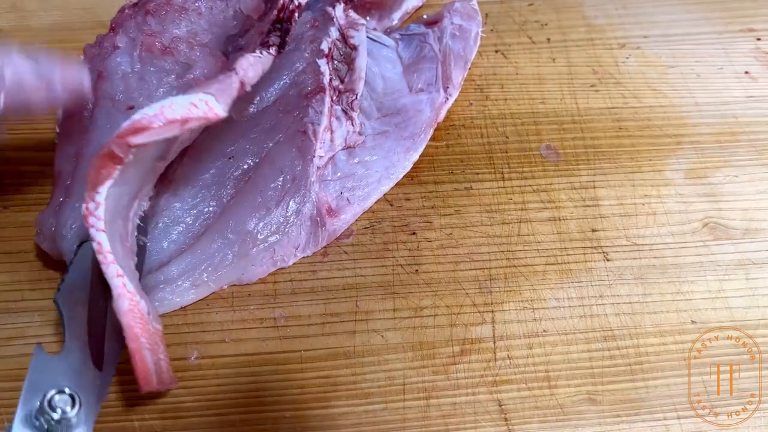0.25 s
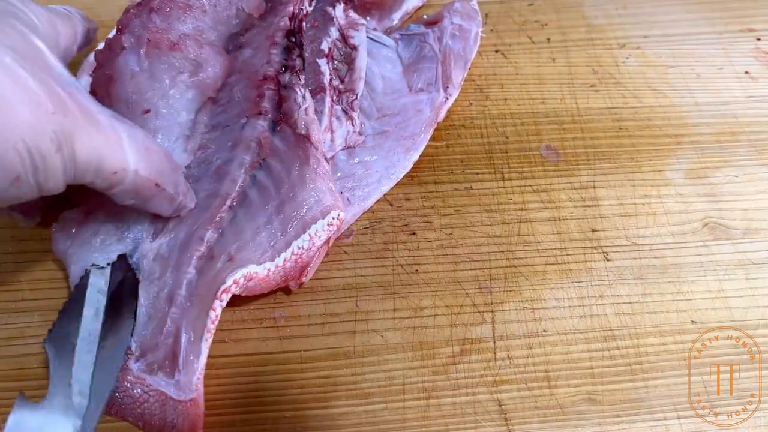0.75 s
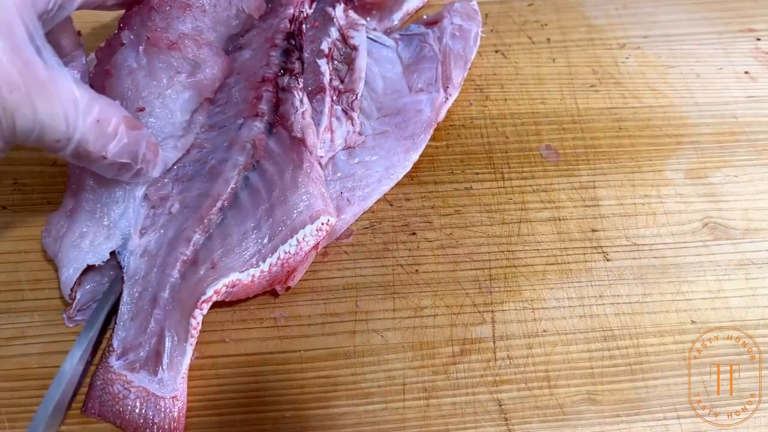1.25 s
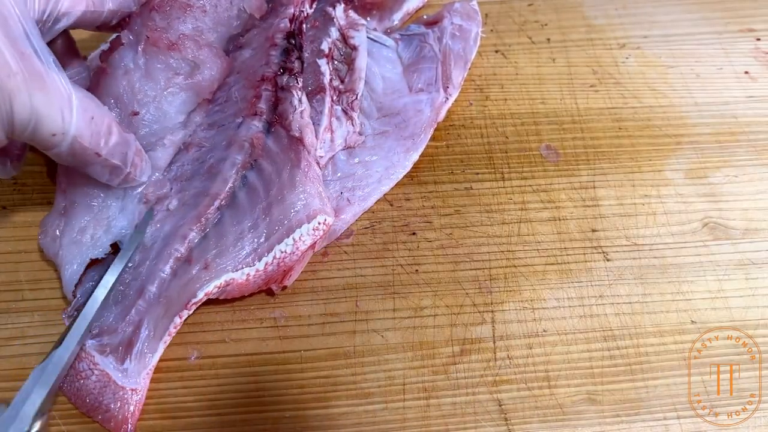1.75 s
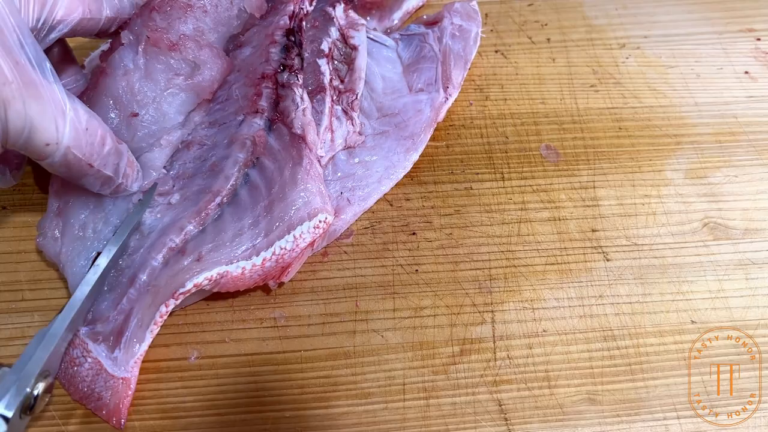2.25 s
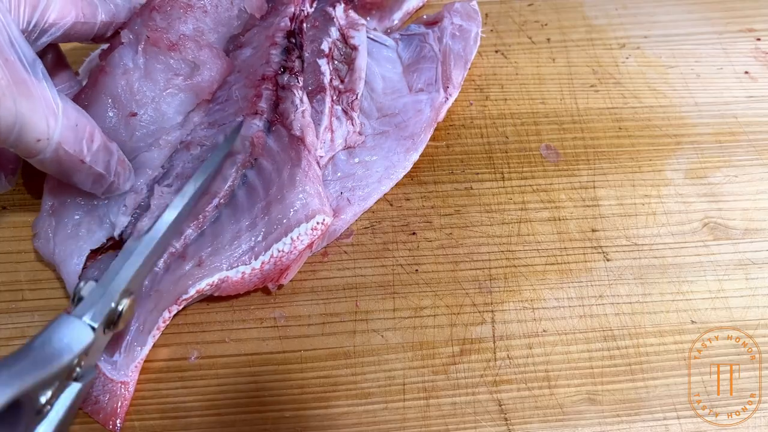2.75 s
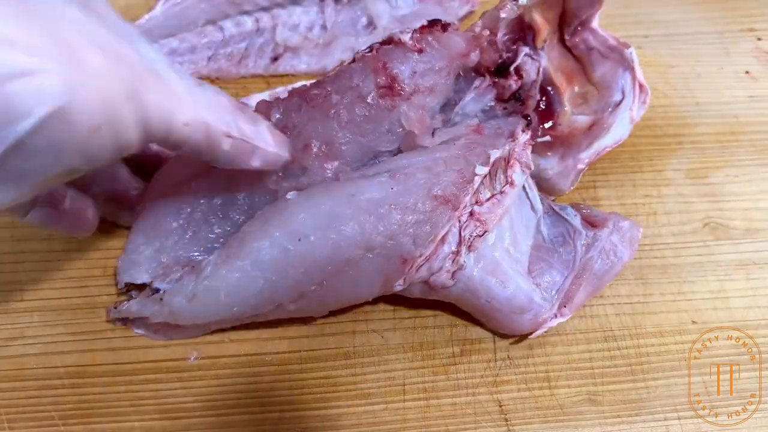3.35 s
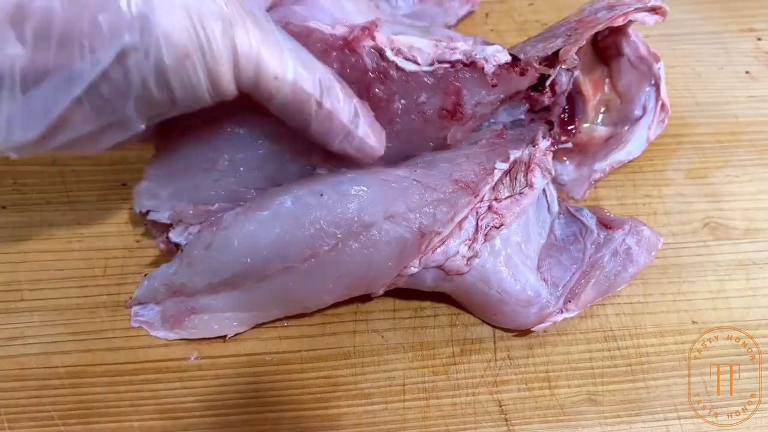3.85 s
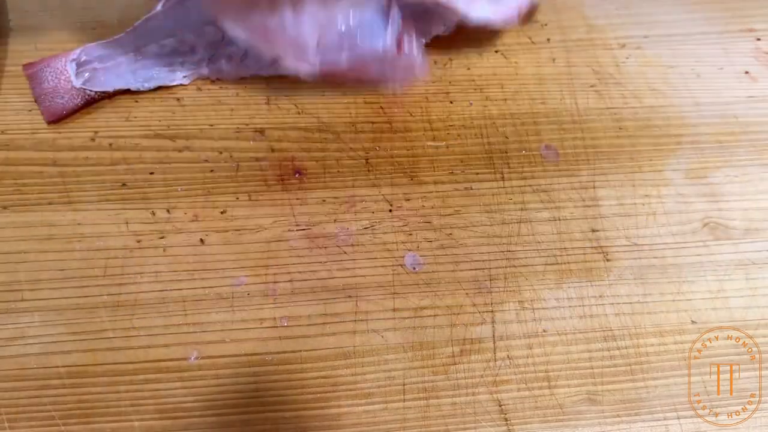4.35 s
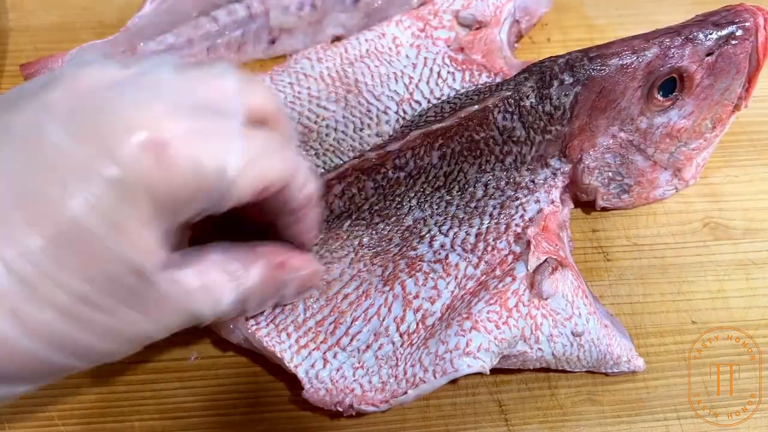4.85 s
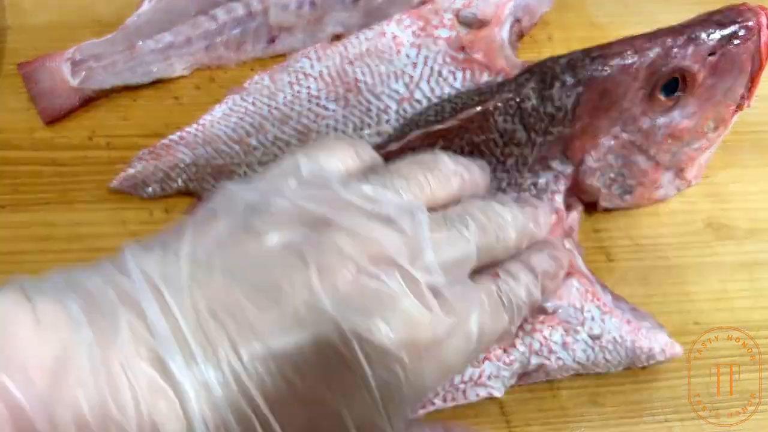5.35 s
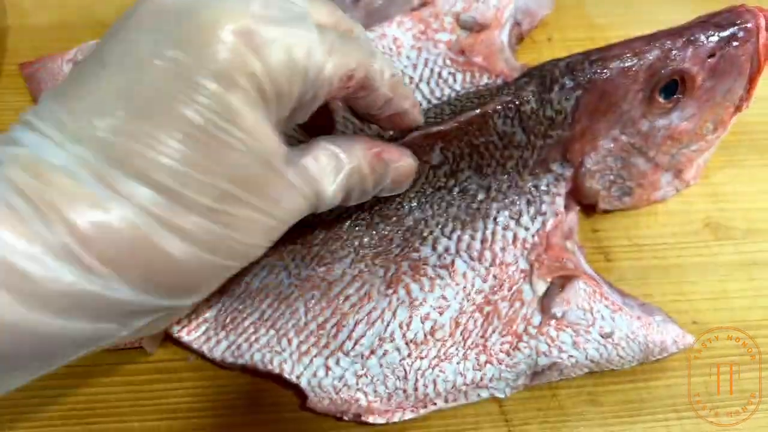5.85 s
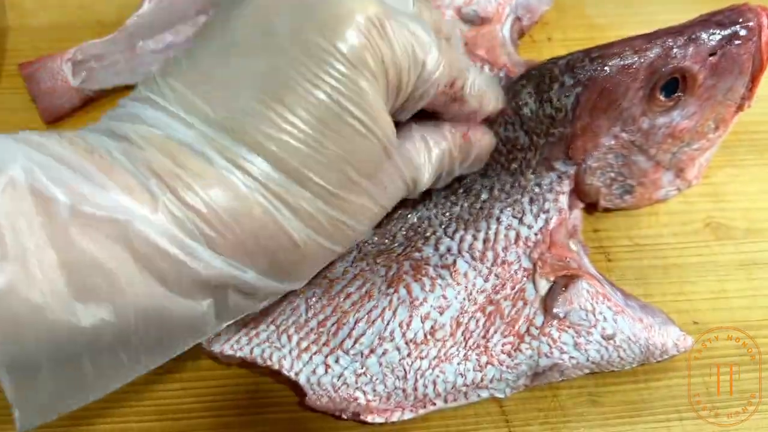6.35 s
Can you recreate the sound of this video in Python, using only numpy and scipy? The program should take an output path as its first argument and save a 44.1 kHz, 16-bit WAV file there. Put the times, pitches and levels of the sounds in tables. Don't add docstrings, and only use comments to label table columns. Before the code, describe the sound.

A close, dry-ish take in a small hard-walled kitchen, with a faint low appliance hum and soft air noise throughout. From 0 to 0.8 s thin plastic gloves crackle and wet flesh rubs and pops as a flap is folded; around 0.3 s the shears clack shut with a dull double knock on the wooden board. From 1 to 1.9 s it is nearly quiet, only tiny creaks. A soft low thud at 1.9 s, then a rising steel scrape at 2.0-2.15 s. At 2.35 s a sharp snip cracks bone; at 2.66 s a second, much louder crunch, both with a brief bright steel ring. From 2.9 to 4.0 s gloves crinkle and flesh squelches, strongest near 3.7 s. After a lull at 4.2 s, a rustling burst at 4.4-4.8 s lays the fish down, followed by lighter crinkles, pats and sticky pops until 6.6 s.

```python
import sys
import numpy as np
from scipy import signal
from scipy.fft import rfft, irfft
from scipy.io import wavfile
from scipy.ndimage import uniform_filter1d

SR = 44100
rng = np.random.default_rng(int(sys.argv[2]) if len(sys.argv) > 2 else 0)


def to_wav(s):
    ch = np.atleast_2d(s).T
    pcm = np.round(np.clip(ch, -1, 1) * 32767)
    wavfile.write(sys.argv[1], SR, pcm.astype(np.int16))


def gain_from_db(level_db):
    decades = np.asarray(level_db, float) / 20
    return 10 ** decades


N = 291501


def evened(x):
    return x / np.sqrt(np.mean(x ** 2) + 1e-20)


def crest(x):
    return x / np.sqrt(uniform_filter1d(x ** 2, size=130).max())


def read(points, hz):
    f, value = np.transpose(points)
    return np.interp(np.log(hz + 1), np.log(f + 1), value)


def coloured(x, points):
    gain_db = read(points, abs(np.fft.fftfreq(4096, 1 / SR)))
    log_gain = np.log(gain_from_db(np.maximum(gain_db, -100)))
    taps = np.fft.ifft(np.exp(np.conj(signal.hilbert(log_gain)))).real[:2048]
    return signal.oaconvolve(x, taps / np.linalg.norm(taps))[:len(x)]


def resonate(x, hz, width_hz):
    pole = np.exp((2j * np.pi * hz - np.pi * abs(width_hz)) / SR)
    return 2 * signal.lfilter([1 - abs(pole)], [1, -pole], x).real


def ring(x, modes, longest_s):
    t = np.arange(SR // 4) / SR
    taps = np.zeros(len(t))
    for hz, db, t60_s in modes:
        taps += gain_from_db(db - 60 * t / min(t60_s, longest_s)) * np.sin(2 * np.pi * hz * t)
    return signal.oaconvolve(x, taps / abs(taps).max())[:len(x)]


def add(mix, s, sound):
    part = mix[round(s * SR):][:len(sound)]
    part += sound[:len(part)]


def burst(noise, length_s):
    u = np.arange(len(noise)) / SR / np.clip(length_s, 2e-4, 6e-3)
    x = noise * abs(noise) ** 1.07 * u ** 3 * np.exp(-u)
    return x / np.linalg.norm(x)


def crackle(low_hz, high_hz, count):
    out = np.zeros(N)
    snaps_per_s = 2500
    for hz in np.geomspace(low_hz, high_hz, num=count):
        clumps = evened(uniform_filter1d(rng.standard_normal(N), size=400))
        snaps = rng.standard_normal(N) * (rng.random(N) < snaps_per_s / SR) * gain_from_db(4.8 * clumps)
        out += evened(resonate(snaps, hz, 0.22 * hz)) * np.sqrt(hz)
    return out


def pops(rows, width):
    out, top = np.zeros(N), signal.butter(4, 9000, "high", fs=SR, output="sos")
    pop_s, tick_s, lead_s = 0.0019, 0.00058, .0093
    for (s, hz, db, *tick_db), noise in zip(rows, rng.standard_normal((len(rows), 1200))):
        x = burst(noise, pop_s)[660::-1]
        rung = resonate(resonate(x, hz, width * hz), hz, width * hz)
        add(out, s - lead_s, gain_from_db(db) * crest(rung))
        tick = .5 * x + np.roll(burst(noise[:661], tick_s), 330)
        tick_gain = gain_from_db(np.array(tick_db)).sum()
        add(out, s - lead_s, tick_gain * crest(signal.sosfilt(top, tick)))
    return out


def background():
    # (frequency [Hz], density [dB per Hz])
    air = [(18, -42), (30, -5), (131, -6), (161, -8.5), (287, -3), (721, -12.5), (780, -11.5), (844, -12),
           (1070, -15), (2540, -23.5), (3140, -26.5), (4080, -28.5), (11100, -38.5), (14000, -34.5),
           (16000, -32)]
    # (frequency [Hz], width [Hz], level [dB])
    hum = [(95, 40, -75.5), (205, 38, -71.5), (282, 53, -74.5), (403.8, 28, -76.5)]
    # (start [s], end [s], frequency [Hz], width [Hz], level [dB])
    whine = [(1.0, 2.65, 13620, 15, -89), (1.45, 2.0, 4300, 80, -91), (3.95, 4.3, 3800, 60, -86),
             (2.61, 2.66, 960, 30, -60), (.62, .95, 2400, 200, -76), (1.25, 1.6, 2200, 400, -77)]
    air_db, motor_hz, motor_db = -61.5, 94.2, -71.5
    frames, hz = N // 256 + 5, np.fft.rfftfreq(1024, 1 / SR)
    a, b, patches = rng.standard_normal((frames, 513, 3)).T
    patches = evened(uniform_filter1d(uniform_filter1d(patches, size=12, axis=0), size=14, axis=1))
    z = (a + 1j * b) * gain_from_db(read(air, hz)[:, None] + 1.32 * patches)
    out = gain_from_db(air_db) * evened(signal.istft(z, nperseg=1024, noverlap=768)[1][:N])
    for f, width_hz, db in hum:
        out += gain_from_db(db) * evened(resonate(resonate(rng.standard_normal(N), f, width_hz), f, width_hz))
    t = np.arange(N) / SR
    drift = 1.5 * evened(resonate(rng.standard_normal(N), 0, 3))
    out += gain_from_db(motor_db) * np.sqrt(2) * np.sin(2 * np.pi * motor_hz * t + drift)
    for start, end, f, width_hz, db in whine:
        on = np.clip(np.minimum(t - start, end - t) / 0.01, 0, 1)
        out += gain_from_db(db) * on * evened(resonate(rng.standard_normal(N), f, width_hz))
    return out


def rustle():
    # (time [s], rustle level [dB])
    hands = [
        [(0.0, -65), (0.146, -74), (0.286, -62), (0.472, -74.5), (0.634, -69.5), (0.8, -73), (1.0, -86)],
        [(2.85, -76), (2.9, -66.5), (2.98, -67.5), (3.37, -69.5), (3.68, -61), (3.86, -68.5), (3.98, -78),
         (4.27, -75.5), (4.45, -102)],
        [(4.46, -91), (4.56, -62), (4.63, -71), (4.7, -65), (4.86, -73.5), (5.11, -72), (5.4, -67),
         (5.69, -73.5), (6.61, -73.5)],
    ]
    sizzle_levels = [-0.5, -1, 1]
    rub_levels = [-1.5, -4, -7]
    # (frequency [Hz], density [dB per Hz])
    glove = [(880, -39.5), (1500, 11.5), (2200, -1.5), (2940, -4), (4390, -3), (5390, -10.5), (7010, -2),
             (9530, 6), (11500, -0.5), (15000, -63), (22000, -120)]
    # (frequency [Hz], density [dB per Hz])
    sizzle = [(9000, -17), (11000, -18), (13500, -0.5), (15200, 5.5), (16000, -16)]
    # (frequency [Hz], level [dB])
    flesh = [(500, -31), (900, 0.5), (1500, -8), (2500, -14), (4000, -18.5)]
    t, (film, top, rub) = np.arange(N) / SR, np.zeros((3, N))
    for rows, sizzle_db, rub_db in zip(hands, sizzle_levels, rub_levels):
        s, db = np.transpose(rows)
        effort_db = np.interp(t, s, db)
        on = (t >= s[0]) & (t < s[-1])
        film += on * gain_from_db(effort_db)
        top += on * gain_from_db(sizzle_db - 4 + effort_db)
        rub += on * gain_from_db(rub_db + effort_db)
    out = film * evened(coloured(crackle(low_hz=2320, high_hz=6200, count=6), glove))
    out += rub * coloured(rng.standard_normal(N), flesh)
    out += top * evened(coloured(crackle(low_hz=12700, high_hz=15300, count=2), sizzle))
    return out


def glove_folds():
    # (time [s], ring [Hz], ring level [dB], top tick level [dB])
    folds = [(0.0222, 6200, -64, -55), (0.0771, 6290, -61, -61), (0.2122, 5250, -56.5, -54),
             (0.4783, 9600, -58, -57), (0.5116, 6980, -60.5, -56), (0.566, 7200, -53.5, -51),
             (0.6225, 9000, -62, -67), (0.648, 8870, -60, -67), (0.6918, 9500, -60.5, -66),
             (0.7103, 9300, -64, -70), (0.7747, 6800, -60.5, -60), (0.982, 5530, -68.5, -64),
             (1.3228, 9690, -71, -73), (1.362, 7030, -70, -79), (2.6235, 6450, -46, -45),
             (2.9089, 6200, -59, -66), (2.9211, 6160, -59.5, -77), (3.0149, 6400, -60.5, -59),
             (3.0536, 5530, -58, -75), (3.1314, 6300, -54.5, -55), (3.2724, 4900, -50.5, -53),
             (3.3663, 9730, -61, -67), (3.4788, 9560, -58, -67.5), (3.5166, 7000, -55.5, -66),
             (3.5886, 8850, -54, -64), (3.6171, 6270, -53.5, -70), (3.7213, 6990, -51, -61),
             (3.8169, 5700, -56, -72), (3.9637, 7060, -69, -80), (3.9962, 6840, -66, -66),
             (4.3948, 6940, -49.5, -62), (4.4943, 5500, -56, -59), (4.57, 10600, -55.5, -51),
            (4.6014, 5570, -53, -74), (4.614, 6590, -56, -71), (4.6698, 6400, -49, -69),
            (4.717, 7020, -62, -56), (4.7665, 6550, -54, -57), (4.796, 5730, -54.5, -53),
            (4.925, 5100, -54, -80), (5.012, 6680, -63, -81), (5.055, 6000, -54.5, -81),
            (5.21, 6760, -59, -55), (5.2468, 6900, -58.5, -49), (5.2795, 7040, -59, -68),
            (5.31, 5230, -57, -60), (5.3605, 9600, -53.5, -59), (5.4317, 5380, -59.5, -56.5),
            (5.499, 6760, -63, -57.5), (5.5914, 7450, -53.5, -55), (5.6284, 6850, -55.5, -58),
            (5.665, 9520, -65, -69), (5.7164, 5940, -57.5, -56), (5.8107, 6200, -60.5, -65),
            (5.8364, 6630, -77, -60), (5.902, 8800, -55.5, -68), (6.094, 7550, -58, -76),
            (6.2097, 5600, -60, -59.5), (6.5268, 6300, -50, -76), (6.546, 6460, -55.5, -58),
             (0.4534, 5500, -65, -60), (0.8708, 8530, -67, -75), (1.14, 11000, -77, -75),
              (1.2, 9000, -73, -80), (1.4263, 7750, -75, -82), (1.485, 10500, -77, -74),
              (1.571, 9500, -75, -74), (1.68, 10000, -75, -76), (1.7444, 9000, -76, -67),
              (1.7631, 8000, -73, -68), (5.53, 5810, -68, -62), (5.935, 8740, -77, -70),
              (6.3144, 6340, -64, -73)]
    return pops(folds, width=0.49)


def wet_smacks():
    # (time [s], ring [Hz], ring level [dB])
    wet_pops = [(0.0225, 3850, -55), (0.078, 3620, -54.5), (0.2124, 2640, -52), (0.4777, 3220, -61.5),
                (0.565, 1810, -65), (1.7444, 3230, -58.5), (1.7617, 2980, -62.5), (2.2593, 2070, -63.5),
                (3.0536, 3760, -54.5), (3.1312, 4040, -57), (3.451, 4300, -58), (3.5174, 4160, -52.5),
                (3.6163, 4010, -59), (3.7215, 2350, -60), (3.9267, 3640, -64), (4.3937, 3490, -52),
                (4.4732, 2830, -58.5), (4.555, 2550, -58), (4.57, 1820, -68), (4.6678, 3550, -58),
                (4.796, 2950, -56.5), (4.8803, 2330, -64), (4.975, 3600, -62), (5.28, 4080, -56),
                (5.592, 3300, -56.5), (5.8615, 3260, -61.5), (6.0553, 3730, -64), (6.545, 2780, -55.5),
                (3.432, 3930, -66), (3.479, 4600, -67), (3.55, 4400, -58), (3.576, 4400, -68),
                 (3.606, 2100, -55), (3.643, 1500, -61), (3.706, 1350, -54), (3.702, 3400, -60),
                 (3.734, 6500, -53), (3.749, 8600, -55), (3.75, 3500, -58), (3.783, 1480, -60),
                 (3.807, 5000, -57), (3.811, 2300, -61), (4.476, 1700, -61), (4.515, 9800, -63),
                 (4.547, 1260, -65), (4.562, 1090, -55.5), (4.552, 4400, -59), (4.586, 2500, -59),
                 (4.641, 7680, -59), (4.657, 3620, -57), (4.697, 3290, -61), (4.733, 6400, -60),
                 (4.862, 3360, -62), (5.194, 1430, -64), (5.266, 7500, -58), (5.34, 2000, -64),
                 (5.372, 6600, -61.5), (5.417, 1000, -64), (5.485, 9000, -71), (5.628, 9500, -54),
                 (5.707, 5800, -62), (5.749, 1520, -64), (5.809, 9500, -65), (5.81, 3300, -64),
                 (5.904, 4000, -63), (6.041, 2930, -63), (6.108, 7300, -72), (6.238, 6800, -64),
                 (6.418, 9520, -66), (6.527, 2900, -60), (6.565, 2900, -62), (6.57, 6300, -59),
                 (.077, 10200, -60), (.236, 2500, -66), (.221, 6700, -58)]
    return pops(wet_pops, width=0.49)


def knocks():
    # (time [s], peak level [dB], softness [s])
    blows = [(0.2809, -36.5, 0.00054), (.303, -29.5, 0.00064), (.311, -36, 0.00054),
             (0.3194, -27.5, 0.00094), (0.3227, -25.5, 0.00087), (.331, -30.5, 0.00066),
             (.339, -33.5, 0.00097), (0.351, -36, 0.00085), (2.235, -44.5, 0.00036), (2.614, -35.5, 0.0014)]
    # (frequency [Hz], level [dB], t60 [s])
    board = [(64, -22, 0.086), (108, -5, 0.13), (205, -8, 0.082), (289, -9, 0.072), (418, 8, 0.1),
             (505, 2.5, 0.051), (623, 9, 0.033), (760, 1.5, 0.059), (900, -6, 0.05)]
    pushes = np.zeros(N)
    for s, db, soft_s in blows:
        push = signal.windows.hann(max(round(2 * soft_s * SR), 4))
        add(pushes, s, gain_from_db(db) * push / push.sum())
    return -ring(pushes, board, longest_s=.3)


def clacks():
    # (time [s], peak level [dB], length [s])
    contacts = [(0.284, -35, 0.0021), (.2955, -31, 0.001), (0.2992, -26.5, 0.00097), (0.303, -34.5, .0008),
                (0.319, -37.5, 0.0024)]
    # (frequency [Hz], level [dB], t60 [s])
    handle = [(1330, -2, 0.07), (1717, -3.5, 0.05), (2500, -3, 0.035), (3300, -5.5, 0.06),
              (3655, -2, 0.035), (4240, -7, 0.03), (5000, -3.5, 0.024), (6000, -8, .04),
              (6400, -6.5, 0.026), (6800, -9, 0.06), (7095, -14, .06), (7600, -13, 0.06), (8600, -20, 0.03)]
    blows = np.zeros(N)
    for (s, db, length_s), noise in zip(contacts, rng.standard_normal((len(contacts), 1500))):
        add(blows, s - 3 * length_s, gain_from_db(db) * burst(noise, length_s))
    return ring(blows, handle, longest_s=0.029)


def thuds():
    # (time [s], level [dB], frequency [Hz], t60 [s])
    leans = [(1.935, -44.5, 205, 0.082), (1.934, -50, 105, 0.12), (1.95, -65, 45, .15),
             (2.235, -52, 200, 0.3), (2.25, -54.5, 291, 0.34), (2.416, -49.5, 203, 0.28),
             (2.43, -51, 66, 0.2), (2.65, -62, 66, 0.17), (2.949, -55, 290, 0.22)]
    out, t = np.zeros(N), np.arange(SR // 3) / SR
    for s, db, hz, t60_s in leans:
        swell = 1 - np.exp(-t / 0.0029)
        add(out, s, gain_from_db(db - 60 * t / t60_s) * swell * np.sin(2 * np.pi * hz * t))
    return out


def scrape():
    # (frequency [Hz], width [Hz], level [dB], rise of pitch over the slide [ratio])
    sliding = [(2980, 27, 0, .06), (3950, 55, -11, 0.031), (5660, 87, -1, 0.078), (6250, 41, 0, 0.08),
               (6600, 57, -4, .1), (7540, 59, -7, 0.0178), (8600, 130, -2, 0.031), (11400, 120, -12, 0.012),
               (12500, 46, -19, 0.01), (13100, 55, -8, 0.01), (14400, 130, -17, 0.01),
               (15500, 56, -6, 0.001)]
    open_s, rise_s, hold_s, release_s = 2.0, .048, .07, .04
    slips_per_s, slip_db = 52, 3
    upper_db, upper_db_per_s = -12.5, 146
    s = np.cumsum([0, rise_s, hold_s, release_s])
    t = np.arange(7000) / SR
    wander = evened(uniform_filter1d(rng.standard_normal(len(t)), size=150))
    grip_db = 2.0 * wander + slip_db * np.cos(2 * np.pi * slips_per_s * t + 1.1 * wander)
    slips = rng.standard_normal(len(t)) * gain_from_db(grip_db)
    low, high = np.zeros(len(t)), .002 * slips
    for f, width_hz, db, rise in sliding:
        climb = np.exp(1j * np.pi * f * rise * t ** 2 / s[-1])
        mode = (signal.hilbert(resonate(slips, f, 3.4 * width_hz)) * climb).real
        mode *= gain_from_db(db) / np.sqrt(width_hz)
        if f < 4500:
            low += mode
        else:
            high += mode
    level = gain_from_db(-59 + np.interp(t, s, [-26, 0, -2, -41]))
    upper = gain_from_db(upper_db + upper_db_per_s * np.minimum(t, s[2]))
    out = np.zeros(N)
    add(out, open_s, level * (evened(low) + upper * evened(high)))
    return out


def snips():
    # (time [s], energy [dB], length [s], lowest
    # frequency [Hz])
    breaks = [
        [(2.339, -25.5, 0.0055, 3500), (2.3445, -17, .0012, 5000), (2.3485, -13.5, .0007, 2500),
         (2.351, -9.5, .0006, 300), (2.3547, -6, 0.00084, 2580), (2.3585, -17, 0.00066, 3000)],
        [(2.6525, -23.5, .003, 5000), (2.6555, -10, 0.0011, 5000), (2.658, -9, 0.0009, 4000),
         (2.6606, 0.5, 0.00067, 300), (2.6644, 0.5, .0007, 4500), (2.6668, -1, 0.00059, 4500)],
    ]
    # (frequency [Hz], density [dB per Hz])
    bones = [
        [(400, -59), (750, -8.5), (1300, -7.5), (2500, -11.5), (3600, -4), (4400, -10), (6300, -1), (7500, -2),
         (8500, -16.5), (9800, -6.5), (11300, -17.5), (13700, -26), (15300, -7), (16000, -18.5)],
        [(400, -54.5), (750, -13), (1300, -14.5), (2600, -7.5), (3600, -8.5), (4500, -11.5), (6400, -2.5),
         (8000, -1.5), (8900, -12), (9700, -6), (12000, -11), (14300, -10), (15400, -6.5), (16000, -4.5)],
    ]
    # (frequency [Hz], level [dB], t60 [s])
    steel = [
        [(3680, -8, .2), (3784, -15.5, .2), (5040, -11, .15), (6300, -6, .17), (6340, -1, .25),
         (6200, -8.5, 0.18), (6410, -3, .15), (6515, 1, .12), (7230, -6, .14), (7300, -11, .14),
         (9130, -7.5, .18), (9720, -7, .2), (10090, -10, .14), (15670, -16, .16)],
        [(4823, -11.5, .2), (5600, -3.5, .11), (6080, -6, .2), (6290, -1, .15), (6500, -1, .18),
         (6500, 0, 0.18), (6659, -7, .2), (7036, -6, .16), (7251, -6, .2), (7836, -6, .16), (8100, -7.5, .17),
         (9634, -10, 0.13), (10300, -12, .2), (15360, -10, .2)],
    ]
    steel_levels = [-22.5, -21]
    # (time [s], ring [Hz], ring level [dB])
    bites = [(2.33, 3000, -67), (2.3355, 3300, -62), (2.34, 3200, -55), (2.345, 3888, -51),
             (2.6135, 3180, -54), (2.6197, 4100, -45), (2.624, 3270, -43), (2.622, 7600, -50.5),
             (2.6275, 7600, -51), (2.63, 2320, -54)]
    out, hz = np.zeros(N), np.fft.rfftfreq(2048, 1 / SR)
    for rows, colour, modes, steel_db in zip(breaks, bones, steel, steel_levels):
        cracks = np.zeros(N)
        for (s, db, length_s, low_hz), noise in zip(rows, rng.standard_normal((len(rows), 2048))):
            z = rfft(np.roll(burst(noise, length_s), 100))
            power = uniform_filter1d(abs(z) ** 2, size=24)
            flat = irfft(z / np.sqrt(power * (1 + (low_hz / (hz + 1)) ** 8)))
            add(cracks, s - 3 * length_s - 100 / SR, gain_from_db(db) * flat[:1500])
        out += coloured(cracks, colour) + gain_from_db(steel_db) * ring(cracks, modes, longest_s=.25)
    return out + pops(bites, width=0.18)


def kitchen(x):
    # (frequency [Hz], t60 [s])
    walls = [(500, 0.16), (1500, 0.23), (4000, 0.26), (9000, 0.31), (16000, 0.22)]
    out, turn = np.zeros(N), np.arange(N) / SR / .011
    for k in range(3):
        taps = np.zeros(SR // 2)
        at = np.arange(160, len(taps) - 10, 10)
        taps[at + rng.integers(0, 10, len(at))] = rng.choice([-1., 1.], len(at))
        hz, t, z = signal.stft(taps, SR, nperseg=256)
        tail = signal.istft(z * gain_from_db(-60 * t / read(walls, hz)[:, None]), SR, nperseg=256)[1]
        share = np.sqrt(2 / 3) * np.sin(np.pi * (turn + k / 3))
        out += signal.fftconvolve(x * share, tail / np.linalg.norm(tail))[:N]
    return out


def scene():
    film = rustle() + glove_folds() + wet_smacks()
    dull = knocks() + clacks() + thuds()
    slide = scrape()
    steel = snips()
    wet = kitchen(gain_from_db(-4.0) * steel + gain_from_db(-5) * slide + gain_from_db(-3.5) * film + gain_from_db(-2.5) * dull)
    return (steel + slide + film + dull + wet + background())[None]


def starve(x):
    # (time [s], lowest frequency hit [Hz])
    starved = [(.097, 2400), (.311, 4000), (.588, 1600), (.906, 4300), (1.95, 2500), (2.165, 2200),
               (2.271, 3000), (2.464, 1900), (3.679, 2800), (4.154, 2000), (4.957, 3200), (5.002, 5000),
               (5.236, 1000), (5.387, 1200), (5.878, 5000), (6.089, 2000), (6.134, 3200), (6.261, 2000),
               (6.303, 2000), (6.452, 2000)]
    # (time [s], lowest frequency hit [Hz], share of lines kept [ratio])
    emptied = [(4.155, 5300, .012), (4.162, 5300, .012)]
    frame, usual_kept, loss = 941, .13, .98
    x, window = x.copy(), np.sin(np.pi * (np.arange(2 * frame) + .5) / (2 * frame))
    hz = np.fft.rfftfreq(2 * frame, 1 / SR)
    for s, low_hz, kept in [(*row, usual_kept) for row in starved] + emptied:
        start = round(s * SR) - frame
        z = rfft(window * x[start:start + 2 * frame])
        height = uniform_filter1d(abs(z), size=4) / uniform_filter1d(abs(z), size=120)
        lost = (height < np.quantile(height, 1 - kept)) & (hz > low_hz)
        add(x, start / SR, -window ** 2 * irfft(loss * z * lost))
    return x


def band_limit(x):
    return signal.sosfilt(signal.butter(12, 16480, fs=SR, output="sos"), x)


def record(dry):
    x = signal.sosfilt(signal.butter(3, 45, "high", fs=SR, output="sos"), dry[0])
    x = signal.oaconvolve(x, signal.firwin(401, 15850, window=("kaiser", 10), fs=SR), "same")
    return band_limit(starve(x)[None])


dry = scene()
out = record(dry)
to_wav(out)
```